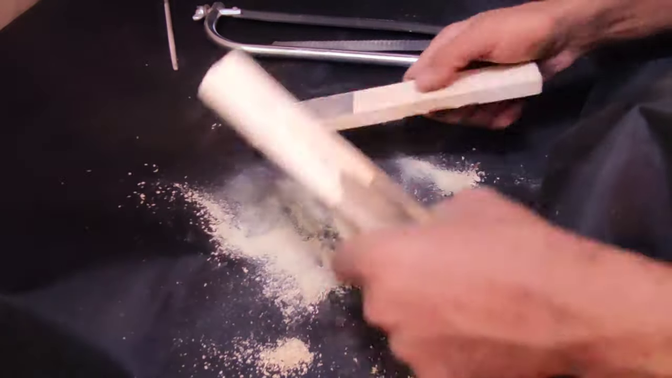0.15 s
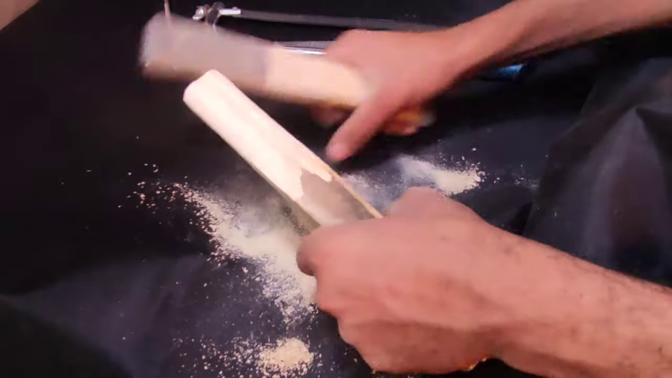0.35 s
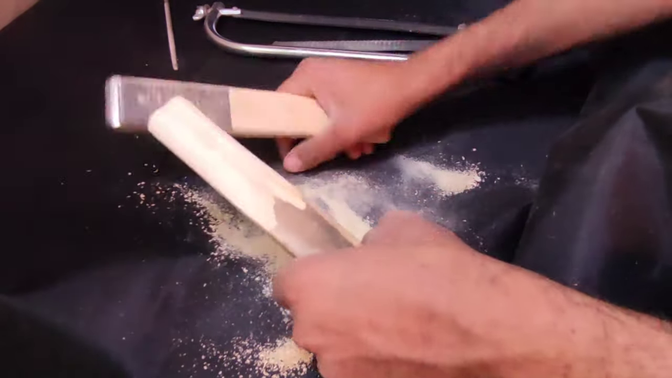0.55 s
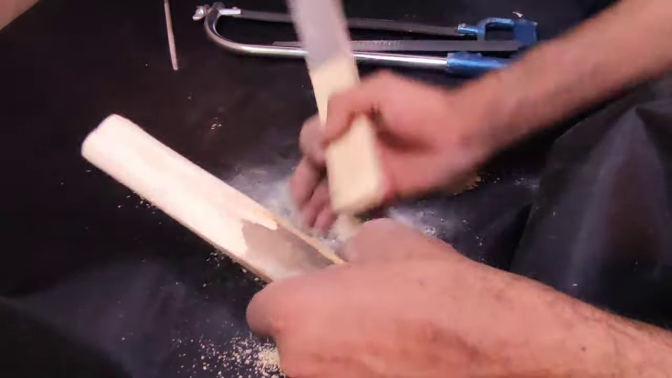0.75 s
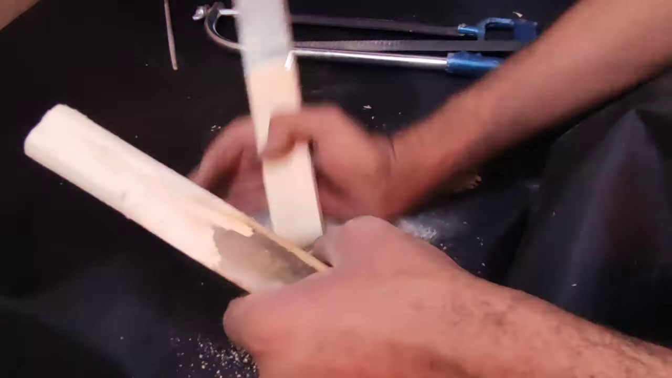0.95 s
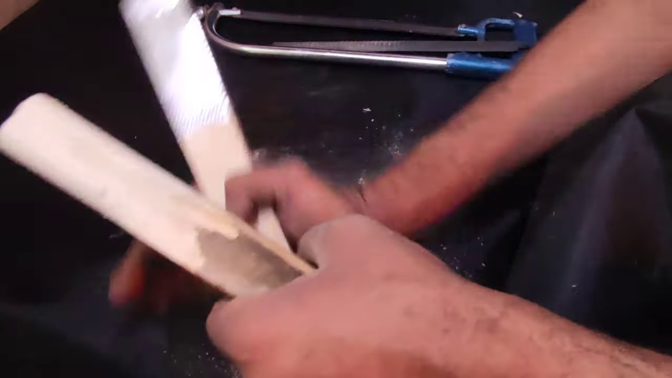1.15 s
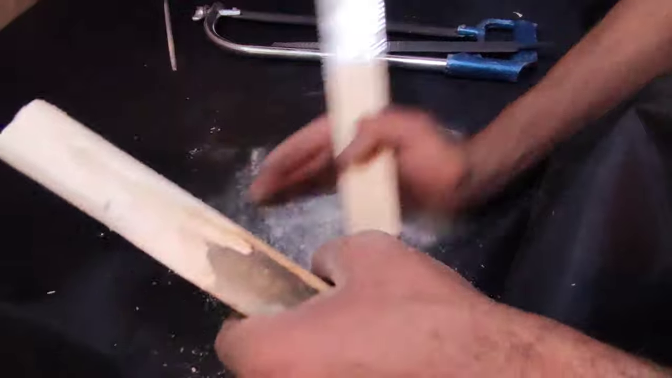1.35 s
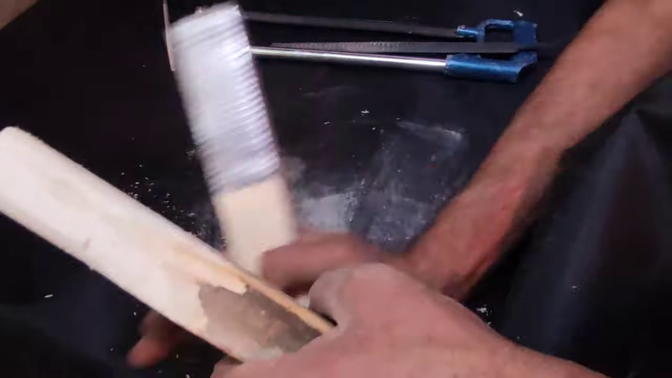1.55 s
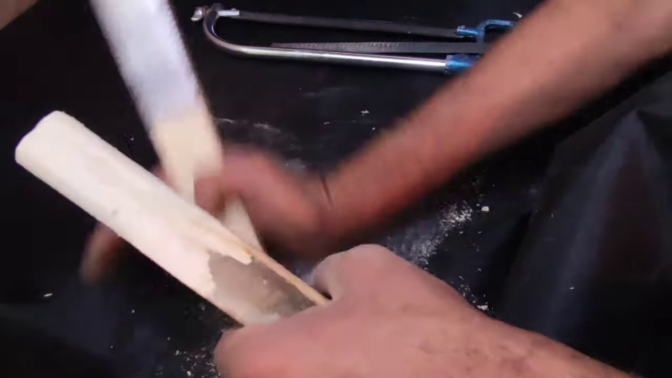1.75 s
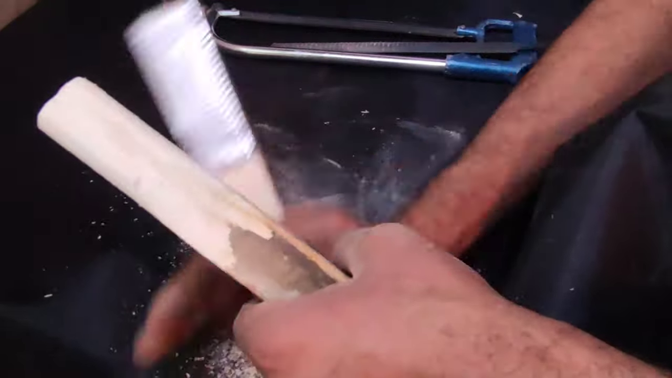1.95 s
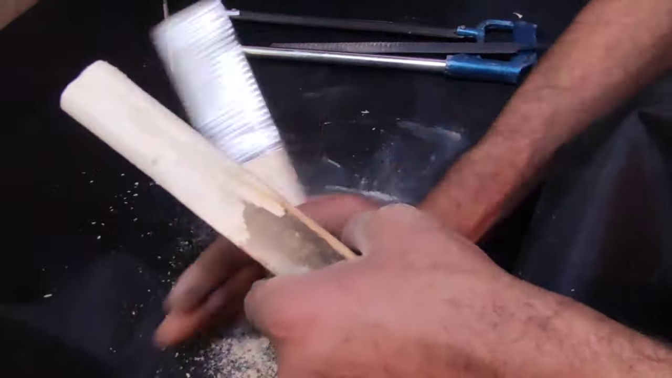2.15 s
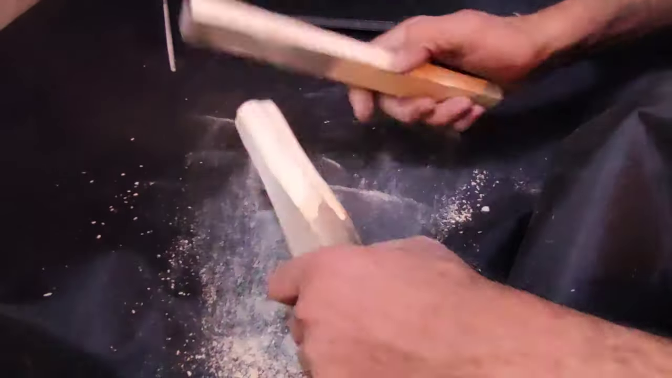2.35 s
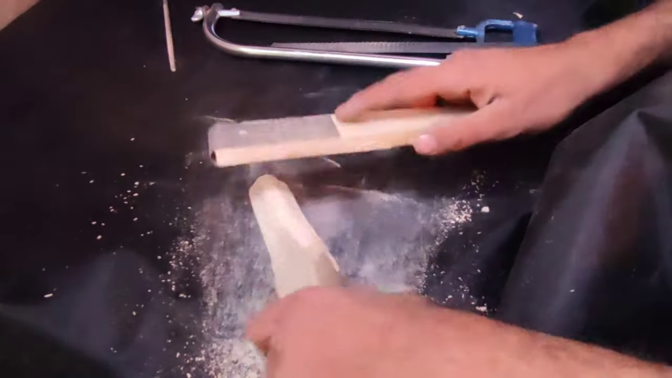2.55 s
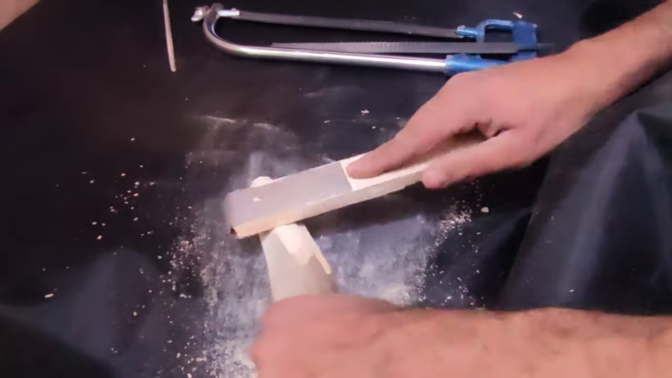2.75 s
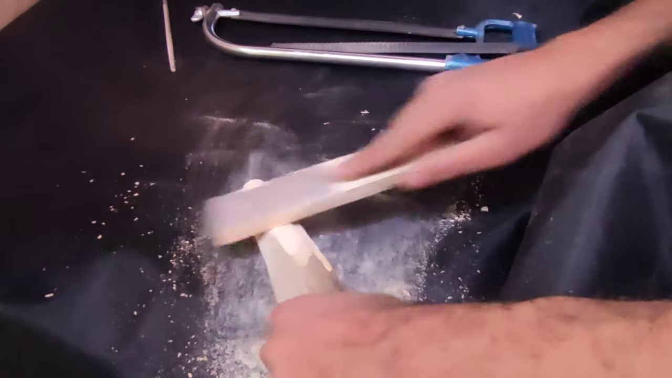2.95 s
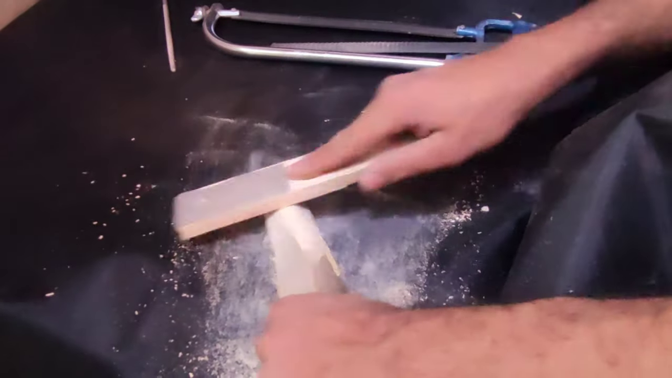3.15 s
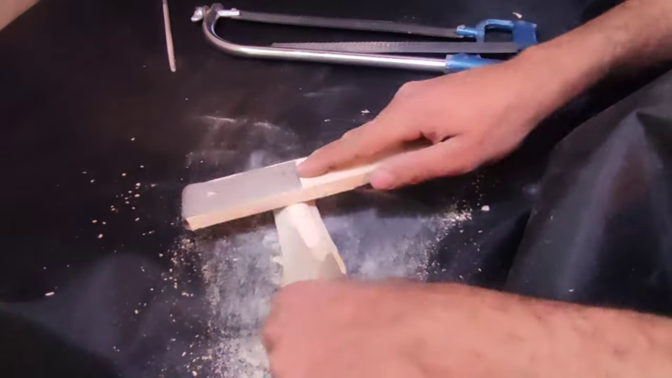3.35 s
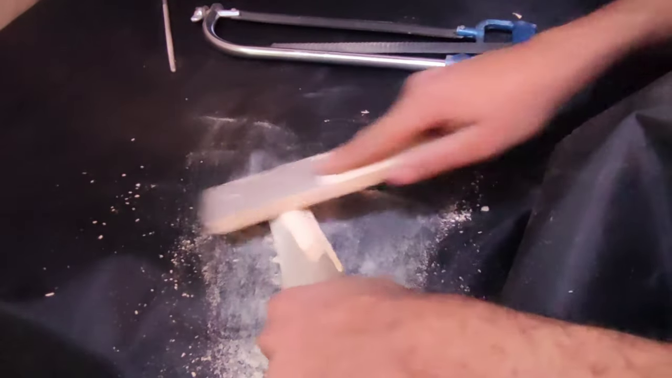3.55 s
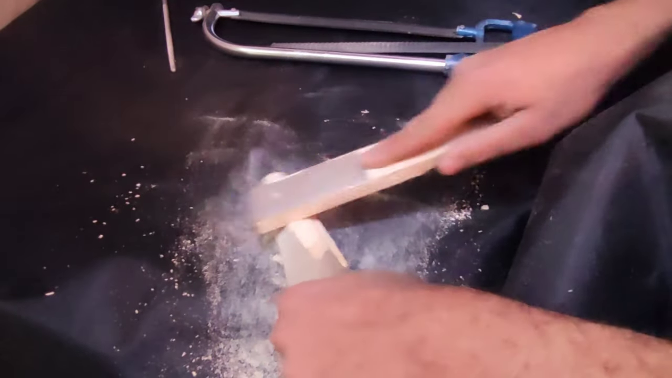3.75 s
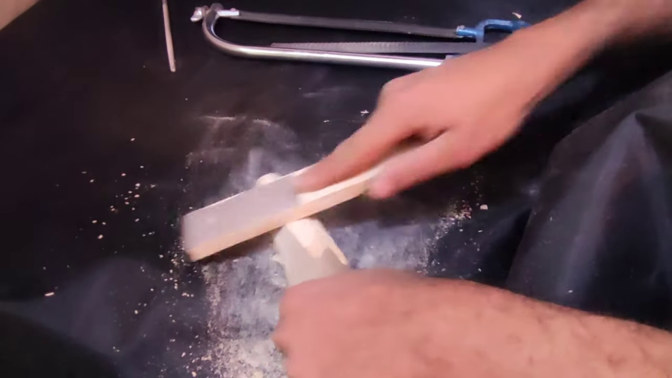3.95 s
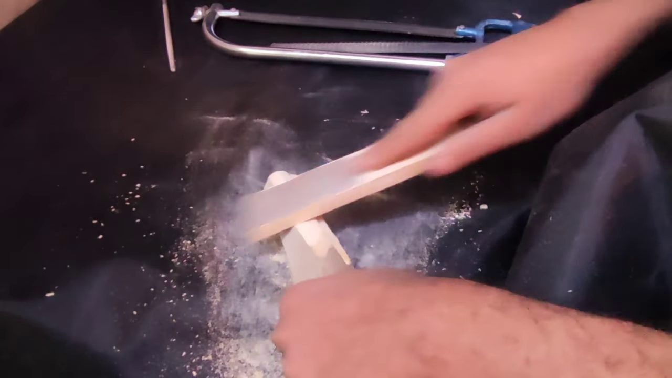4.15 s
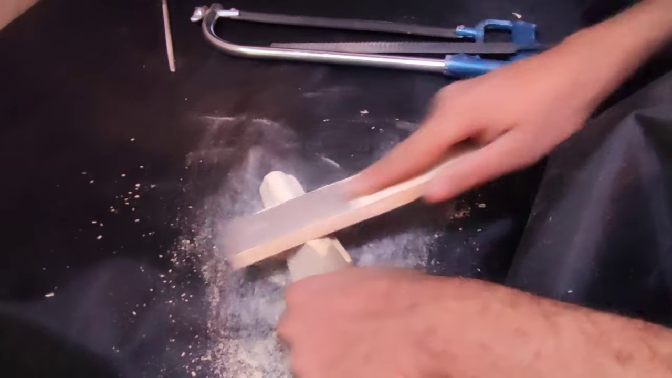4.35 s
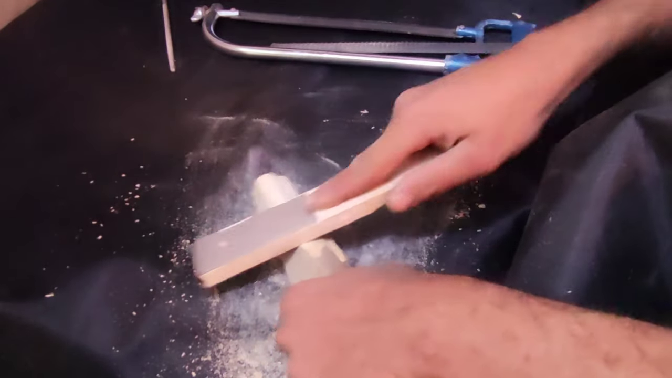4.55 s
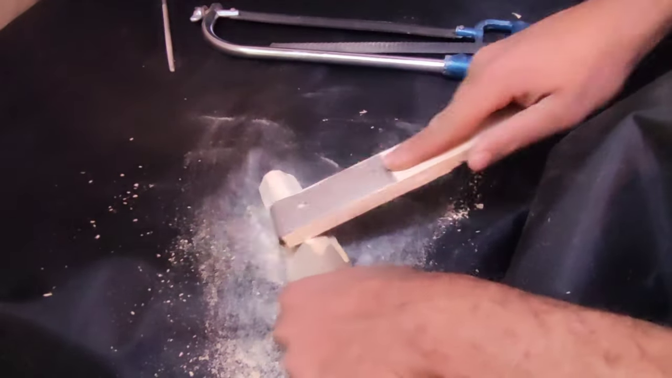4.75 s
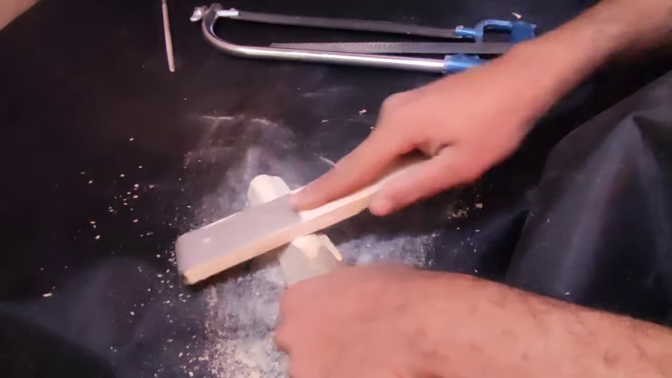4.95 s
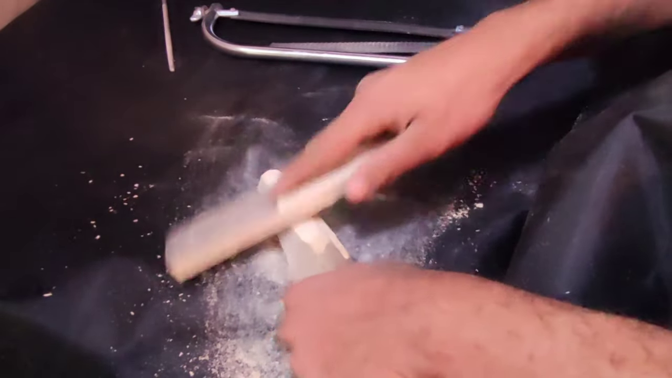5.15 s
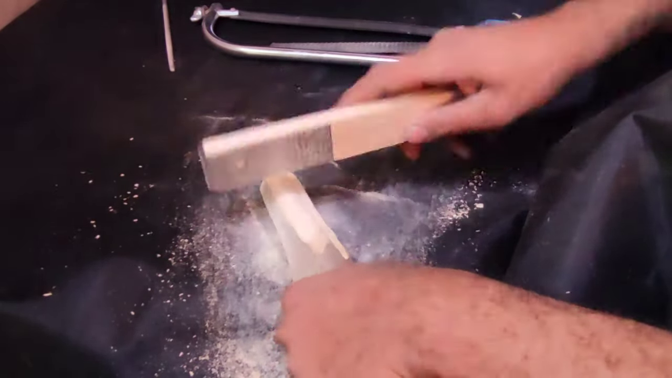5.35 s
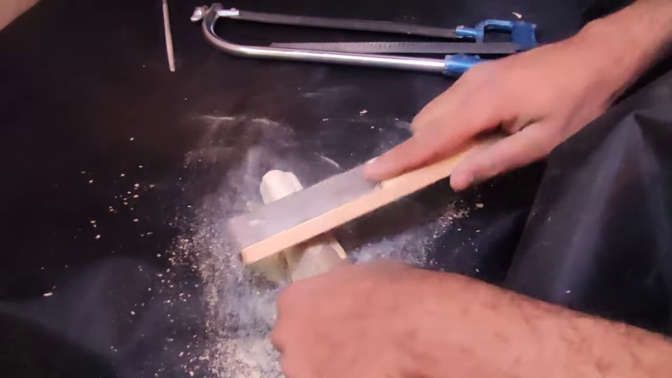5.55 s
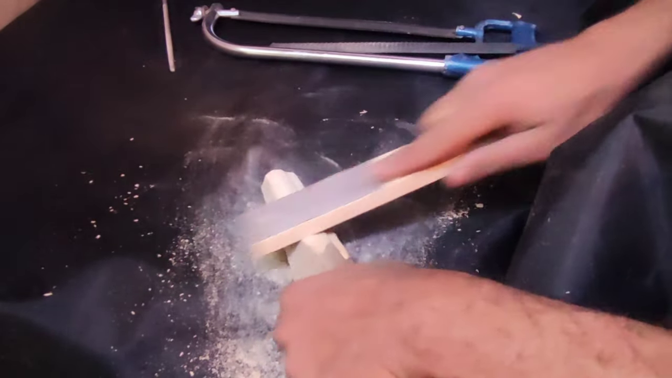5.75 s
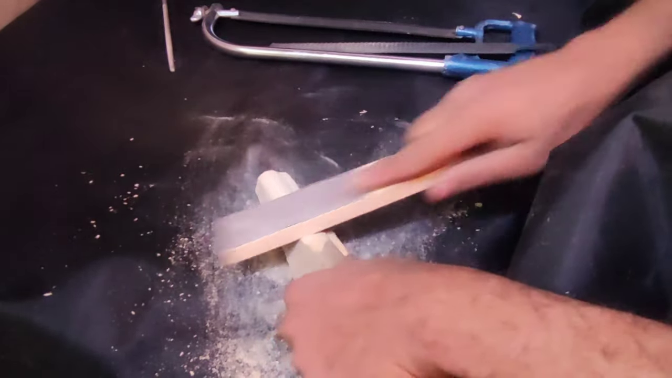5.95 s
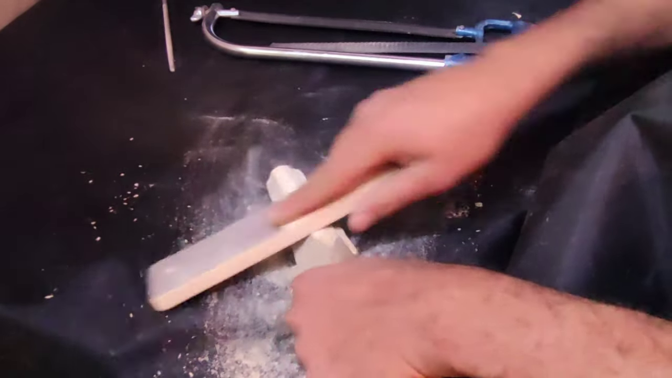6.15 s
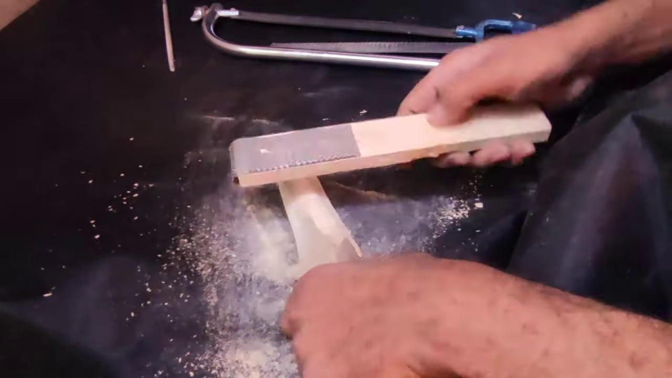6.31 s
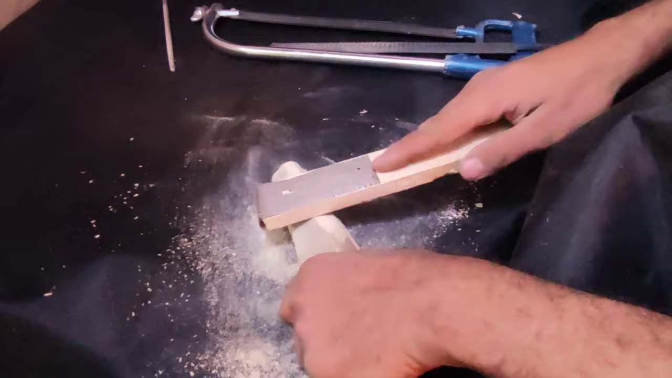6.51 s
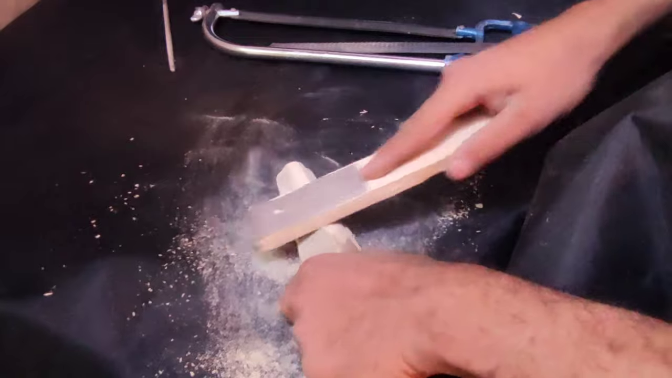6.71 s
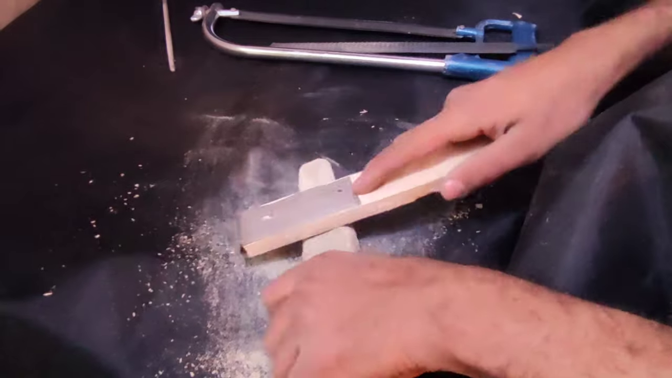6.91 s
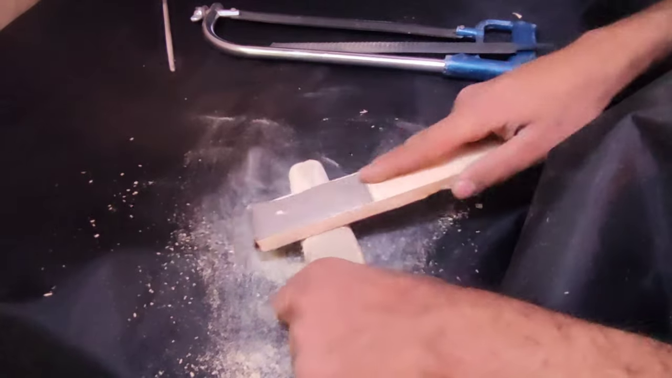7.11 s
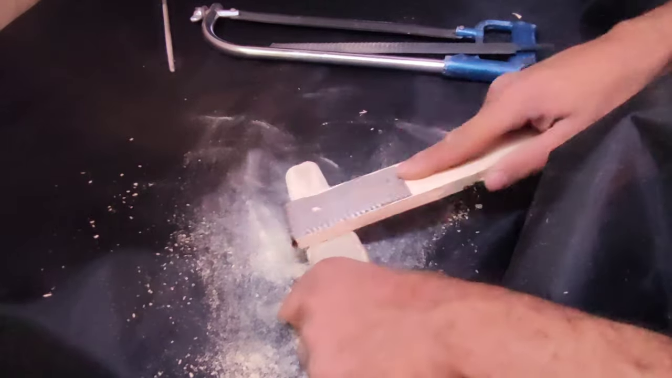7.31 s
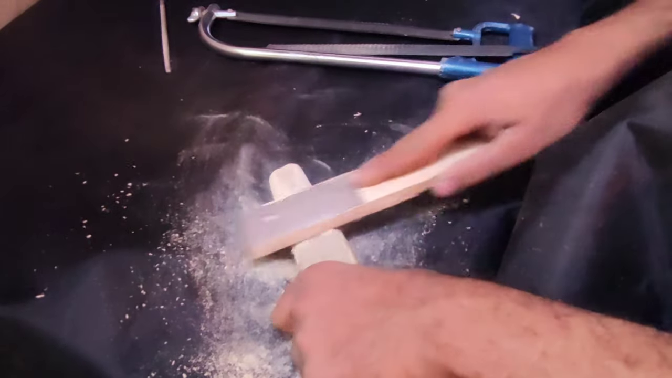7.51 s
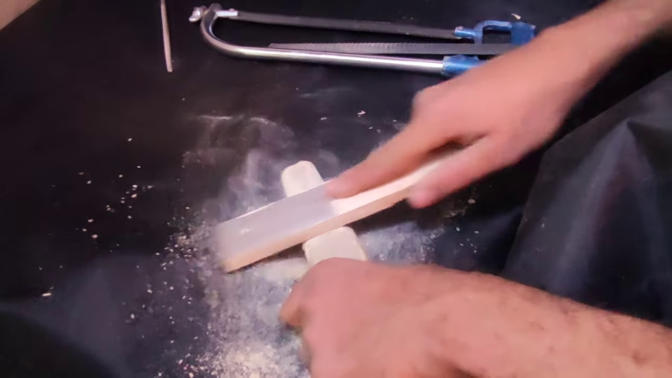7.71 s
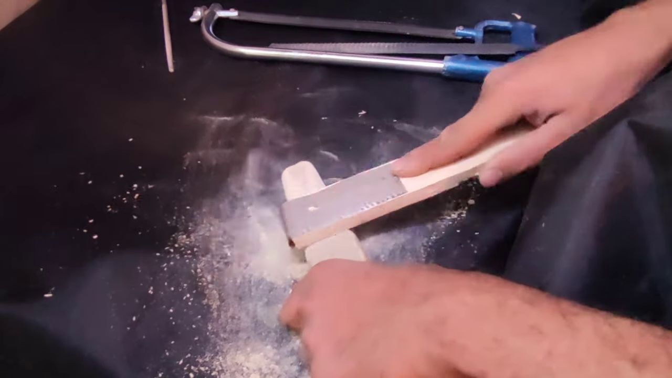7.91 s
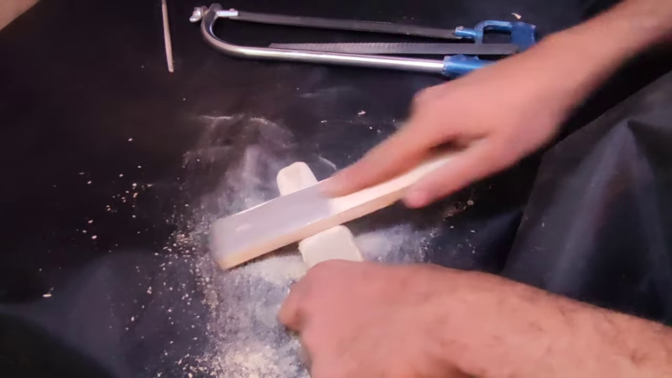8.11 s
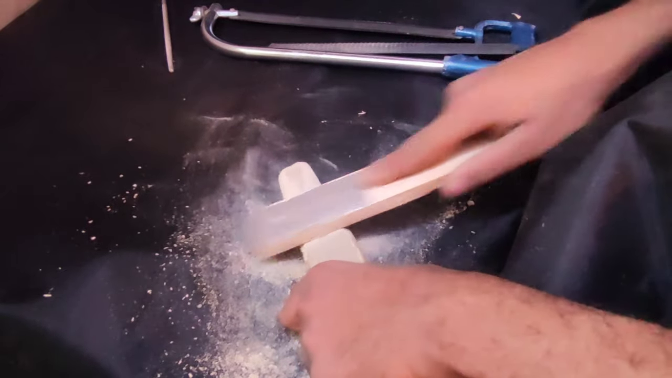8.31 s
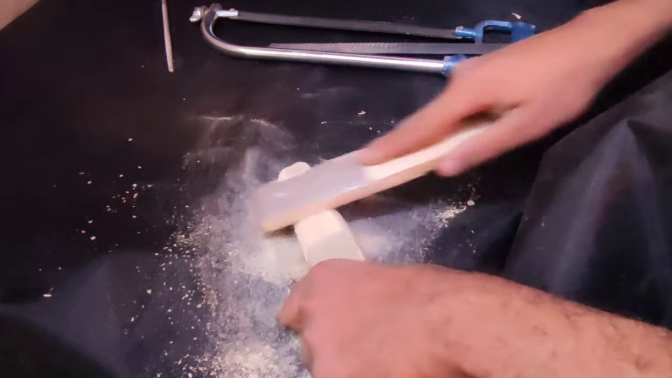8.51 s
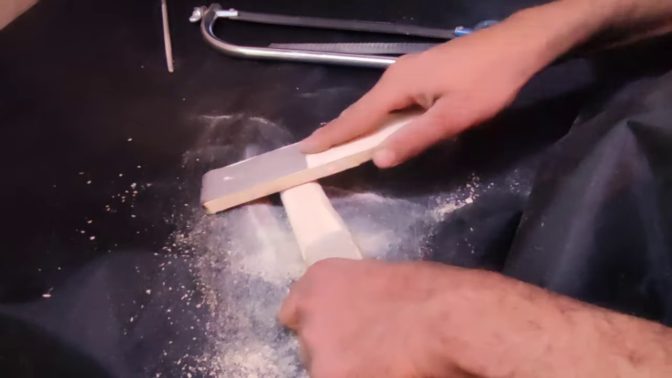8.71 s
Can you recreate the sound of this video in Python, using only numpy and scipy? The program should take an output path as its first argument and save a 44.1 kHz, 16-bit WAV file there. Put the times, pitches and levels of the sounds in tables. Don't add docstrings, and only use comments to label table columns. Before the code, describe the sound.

Brisk palm sweeps of sawdust, a few knocks, then fast gritty to-and-fro filing on wood over a hollow bench, with short pauses.

```python
import sys
import numpy as np
from scipy import signal
from scipy.fft import rfft, irfft, next_fast_len
from scipy.io import wavfile
from scipy.ndimage import uniform_filter1d

SR = 44100
rng = np.random.default_rng(int(sys.argv[2]) if len(sys.argv) > 2 else 0)


def to_wav(sig):
    pcm = np.clip(np.atleast_2d(sig), -1, 1) * 32767
    pcm = np.round(pcm).astype(np.int16)
    wavfile.write(sys.argv[1], SR, pcm.T)


def convert_level_to_amplitude(level_db):
    exponent = np.asarray(level_db, float) / 20
    return 10 ** exponent


N = 386757

# (frequency [Hz], width [Hz], level [dB])
FILE_MODES = [(4520, 355, 2.5), (4700, 1400, -2), (7050, 960, -0.5), (9240, 4100, -15), (16100, 5700, -23),
              (3100, 1070, -8.5)]
# (frequency [Hz], width [Hz], level [dB])
STICK_MODES = [(708, 66, 13.5), (1149, 132, -1.5), (1007, 590, -3), (1405, 480, 4), (612, 72, 5.5)]
# (frequency [Hz], width [Hz], level [dB])
BENCH_MODES = [(155, 13, -21), (215.3, 40.7, -0.9), (291.4, 14.8, 1.5), (334.5, 25, -2.4), (403, 26, 3.5),
               (471, 32.5, -2)]
# (frequency [Hz], width [Hz], level [dB])
DUST_MODES = [(4760, 2560, -4), (6880, 1300, 1.5), (10000, 6200, -14), (15800, 1300, -16), (3130, 930, -12)]
# (frequency [Hz], width [Hz], level [dB])
PALM_MODES = [(712, 71, 4.5), (1003, 386, -0.5), (1680, 410, -2), (2260, 670, -4.5)]
# (frequency [Hz], width [Hz], level [dB])
MAT_MODES = [(203, 133, 0), (300, 215, 1), (557, 140, -2)]


def rms_one(x):
    return x / np.sqrt(np.mean(x ** 2) + 1e-20)


def evened(x, window_s):
    power = uniform_filter1d(np.mean(x ** 2, axis=0), int(window_s * SR))
    return x / np.sqrt(power + 1e-20)


def in_time(rows):
    s, *columns = np.transpose(rows)
    t = np.arange(N) / SR
    return [np.interp(t, s, column) for column in columns]


def at_hz(points, hz):
    point_hz, value = np.transpose(points)
    return np.interp(np.log(hz), np.log(point_hz), value)


def drift(rate_hz):
    r = np.exp(-2 * np.pi * rate_hz / SR)
    noise = rng.standard_normal(N + 9000)
    return rms_one(signal.lfilter([1], [1, -2 * r, r * r], noise)[9000:])


def resonate(x, hz, width_hz):
    r = np.exp(-np.pi * width_hz / SR)
    feed = np.array([1, 0, -1]) * (1 - r * r) / 2
    return signal.lfilter(feed, [1, -2 * r * np.cos(2 * np.pi * hz / SR), r * r], x + 1e-18)


def to_ports(pair, hz):
    # (frequency [Hz], likeness [0-1])
    port_likeness = [(60, 0.98), (130, 1), (290, 0.92), (640, 0.59), (1410, 0.16), (3100, 0.12),
                     (6820, 0.057), (15000, 1)]
    lean_db = -0.66
    phased = 0.043
    alike = np.clip(at_hz(port_likeness, hz), 0, 1)
    lean = convert_level_to_amplitude(lean_db / 2 * np.array([[1], [-1]]))
    quarter_turn = np.gradient(pair[0]) / np.sin(2 * np.pi * hz / SR)
    side = np.sqrt(phased) * quarter_turn + np.sqrt(1 - phased) * pair[1]
    return lean * (np.sqrt(1 + alike) * pair[0] + np.sqrt(1 - alike) * side * [[1], [-1]])


def grit(per_s, spread_db, lumps_db, lumps_hz):
    size_db = spread_db * np.minimum(rng.exponential(1, N), 5) + lumps_db * drift(lumps_hz)
    clicks = rng.random(N) < per_s / SR
    return rms_one(convert_level_to_amplitude(size_db) * clicks * rng.standard_normal((2, N)))


def strokes(rows, rise, fall):
    power, progress = np.zeros((len(rows[0]) - 3, N)), np.zeros(N)
    for start, length, place, *level_db in rows:
        place = np.clip(place, .05, .95)
        first = max(int((start - .06) * SR), 0)
        i = np.arange(first, min(int((start + length + 0.11) * SR), N))
        from_peak = np.abs(i / SR - start - length * place)
        before = i / SR < start + length * place
        swell = (from_peak / (length * place)) ** rise
        release = (from_peak / (length * (1 - place))) ** fall
        drop_db = 7.8 * np.minimum(np.where(before, swell, release), 12)
        power[:, i] += convert_level_to_amplitude(np.array(level_db)[:, None] - drop_db) ** 2
        progress[i] = np.clip((i / SR - start) / length, 0, 1)
    return *np.sqrt(power), progress


def body(clicks, pressure, modes, shift_db={}):
    scale = np.sqrt(sum(convert_level_to_amplitude(2 * db) * np.pi * width / SR for hz, width, db in modes))
    total = 0
    for k, (hz, width, db) in enumerate(modes):
        push = clicks * pressure * convert_level_to_amplitude(shift_db.get(k, 0))
        total = total + (-1) ** k * convert_level_to_amplitude(db) * to_ports(resonate(push, hz, width), hz)
    return total / scale


def room_tone():
    # (frequency [Hz], density [dB per Hz])
    hiss_colour = [(15, -44), (25, 7.0), (213, -22), (257, -15), (879, -30.0), (1060, -27.5), (8100, -30.5),
                   (11200, -37.5), (15000, -29.0), (16000, -35)]
    hz = np.maximum(np.fft.rfftfreq(N, 1 / SR), 1)
    hiss = irfft(rfft(rng.standard_normal((2, N))) * convert_level_to_amplitude(at_hz(hiss_colour, hz)), N)
    return convert_level_to_amplitude(-59.5) * rms_one(hiss)


def workshop(x):
    t60_s, wall_cut_hz = 0.092, 4700
    size = next_fast_len(N + SR)
    w = 2 * np.pi * np.fft.rfftfreq(size)
    dull = 1 / (1 + 1j * w * SR / (2 * np.pi * wall_cut_hz))
    echoes = 0
    for k, lag in enumerate(rng.uniform(0.0067, 0.023, (6, 2, 1)) * SR):
        loop = convert_level_to_amplitude(-60 * lag / SR / t60_s) * dull * np.exp(-1j * w * lag)
        echoes = echoes + (-1) ** k * loop / (1 - loop)
    return irfft(rfft(x, size) * echoes, size)[:, :N]


def rustle():
    # (time [s], level [dB])
    fidget_curve = [(0, -64), (.28, -78), (.5, -59), (.6, -74), (.7, -105), (.86, -65), (.97, -62),
                    (1.1, -61), (1.65, -75), (2.53, -75), (2.6, -65.5), (2.7, -76), (3.2, -56.5),
                    (3.37, -68), (5.2, -62.5), (5.44, -69.5), (6.4, -68), (6.85, -62.5)]
    bright_db, = in_time(fidget_curve)
    rub = grit(7000, spread_db=1.5, lumps_db=7.0, lumps_hz=23.1)
    low = body(rub, convert_level_to_amplitude(bright_db + 1.5), PALM_MODES + MAT_MODES)
    return low + body(rub, convert_level_to_amplitude(bright_db), DUST_MODES)


def shake(on_stick):
    # (time [s], level [dB])
    arm_load = [(0.0, -64), (0.66, -69.5), (1.39, -53.5), (2.1, -61), (2.15, -53), (2.34, -71),
                (3.17, -47.5), (3.42, -59), (3.56, -48.5), (5.06, -43), (5.3, -63.5), (5.94, -49),
                (5.98, -44), (6.42, -72), (6.72, -45), (6.94, -55.5), (8.67, -57), (8.77, -37)]
    # (time [s], level [dB])
    panel_blows = [(0.44, -54.5), (0.96, -57), (1.33, -57), (1.99, -55.5), (2.13, -63), (2.579, -48.5),
                   (2.756, -42), (2.98, -40), (4.24, -41), (4.68, -31.5), (4.85, -40), (5.469, -43.5),
                   (5.602, -35), (6.479, -47), (7.989, -37), (8.44, -33.5)]
    idle_db, filed_db, follows_load = -12.5, -4, 0.54
    lag_s, thump_t60_s, thump_sway_db = 0.027, 0.42, -9.5
    load_db, = in_time(arm_load)
    push = rng.standard_normal((2, 2, N))
    sway = resonate(resonate(push[0], 25.0, 44), 28, 83)
    panel = resonate(resonate(push[1], 103, 9.1), 143, 112)

    lag = np.exp(-1 / (lag_s * SR))
    filed = signal.lfilter([1 - lag], [1, -lag], on_stick ** 2)
    filed = filed * convert_level_to_amplitude(filed_db + follows_load * (load_db + 49.5)) ** 2
    s, db = np.transpose(panel_blows)
    thumps = np.zeros(N)
    thumps[(s * SR).astype(int)] = convert_level_to_amplitude(db)
    thumps = signal.lfilter([1], [1, -convert_level_to_amplitude(-60 / (thump_t60_s * SR))], thumps + 1e-18)

    sway_level = np.hypot(convert_level_to_amplitude(load_db), convert_level_to_amplitude(thump_sway_db) * thumps)
    hum_level = np.sqrt(convert_level_to_amplitude(load_db + idle_db) ** 2 + filed + thumps ** 2)
    return sway_level * evened(to_ports(sway, 49), 0.066) + hum_level * evened(to_ports(panel, 69), 0.14)


def crack(s, level_db, t60_s, modes):
    hits = np.zeros(N)
    hits[np.round(s * SR).astype(int)] = convert_level_to_amplitude(level_db)
    fade = signal.lfilter([1], [1, -convert_level_to_amplitude(-60 / (t60_s * SR))], hits + 1e-18)
    return body(rng.standard_normal((2, N)), fade, modes)


def knocks():
    # (time [s], peak [dB], tick [dB], own ring [Hz],
    # rattle [s])
    set_downs = [(0.004, -44.5, -62, 580, 0.5), (0.132, -43.5, -65, 655, 0.02),
                 (0.412, -47, -62, 1030, 0.08), (1.309, -37.5, -35, 1810, 0.06),
                 (2.083, -48, -41, 224, 0.11), (2.576, -38, -63, 214, 0.14), (2.754, -29, -48, 320, 0.1),
                 (5.466, -22, -45, 337, 0.053), (5.597, -21, -43.5, 223, 0.11),
                 (6.164, -21, -44, 242, 0.042), (6.644, -26, -41, 218, 0.74),
                 (7.042, -42.5, -64, 1260, 0.17)]
    # (time [s], peak [dB])
    grit_ticks = [(0.877, -36), (1.241, -32), (2.3241, -21), (2.723, -34.5), (4.255, -19), (6.1624, -29),
                  (6.1705, -10), (6.576, -34), (7.1344, -13), (7.9964, -13), (8.4617, -25), (8.5717, -15)]
    longest_rattle_s = 0.036
    s, peak_db, tick_db, own_hz, rattle_s = np.transpose(set_downs)
    t = np.arange(SR // 5) / SR
    onset = 1 - np.exp(-t / 0.00051)
    shove = 1.1 * np.exp(-t / .0009)
    settle = np.clip((longest_rattle_s - t) / .01, 0, 1)
    out = np.zeros(N + len(t))
    for k in range(len(s)):
        bounces = signal.lfilter([.07], [1, -.955], rng.standard_normal(len(t)))
        decay = convert_level_to_amplitude(-60 * t / max(rattle_s[k], .004))
        push = (shove + bounces) * onset * decay * settle
        rings = 3.5 * resonate(push, own_hz[k], 59)
        for hz, width, _ in BENCH_MODES + STICK_MODES:
            answer_db = -5.5 * np.log2(hz / own_hz[k]) ** 2 + rng.standard_normal()
            rings += convert_level_to_amplitude(answer_db) * resonate(push, hz, min(width, 90))
        at = round(s[k] * SR)
        out[at:at + len(t)] += convert_level_to_amplitude(peak_db[k]) * rings / np.abs(rings).max()
    grit_s, grit_db = np.transpose(grit_ticks)
    tick = crack(s, tick_db - 8.0, 0.1, DUST_MODES)
    return out[:N] + tick + crack(grit_s, grit_db - 17.0, 0.024, FILE_MODES)


def sweeping():
    # (start [s], length [s], peak place [0-1], level [dB])
    palm_sweeps = [
        (0.77, 0.045, 0.6, -48),
        (0.946, 0.059, 0.43, -42),
        (1.136, 0.059, 1, -38),
        (1.323, 0.086, 0.6, -40),
        (1.509, 0.077, 0.36, -38),
        (1.731, 0.065, 0.57, -37),
        (1.917, 0.078, 0.84, -39),
        (2.108, 0.073, 0.6, -42.5),
    ]
    # (start [s], length [s], dust [dB], palm [dB])
    finger_rubs = [
        (0.001, 0.043, -59.5, -58),
        (0.133, 0.21, -64, -62.5),
        (0.322, 0.033, -55.5, -85),
        (0.405, 0.045, -67, -57.5),
        (0.558, 0.022, -59, -63.5),
        (0.903, 0.038, -62, -55),
        (1.253, 0.022, -63, -58),
        (2.072, 0.024, -50, -52.5),
        (2.315, 0.028, -58, -69),
    ]
    palm_db, mat_db = -2, -10.5
    rows = [(s, length, place, db, db + palm_db, db + mat_db) for s, length, place, db in palm_sweeps]
    rows += [(s, length, 0.086, db, low_db, low_db) for s, length, db, low_db in finger_rubs]
    end = int(2.5 * SR)
    bright, middle, low, progress = np.array(strokes(sorted(rows), rise=4.5, fall=3.6))[:, :end]
    clicks = grit(14000, spread_db=-3.0, lumps_db=2.0, lumps_hz=63)[:, :end]
    cupping = progress - .65
    palm = body(clicks, middle, PALM_MODES, {0: 22 * cupping, 1: 14 * cupping})
    sweep = body(clicks, bright, DUST_MODES) + palm + body(clicks, low, MAT_MODES)
    return np.pad(sweep, [(0, 0), (0, N - end)])


def file_pressure():
    # (start [s], speed [dB], weight on the wood [dB])
    bout_1 = [
        (2.806, -45.5, 8.5),
        (2.879, -41, 5),
        (2.954, -42, 8.5),
        (3.034, -42, 5),
        (3.1, -39.5, 4),
    ]
    # (start [s], speed [dB], weight on the wood [dB])
    bout_2 = [(3.396, -50.5, 1.3), (3.5, -43, 3.5), (3.564, -43.5, 5.5), (3.638, -42.5, 5.1),
              (3.711, -40.5, 3.3), (3.78, -43, 7.6), (3.849, -40.5, 1.7), (3.925, -40, 2), (3.989, -43, 2),
              (4.071, -40.5, 3.8), (4.144, -40.5, 0.033), (4.215, -42.5, 3.1), (4.295, -44, 6.7),
              (4.356, -40, 5.5), (4.433, -45, 5.2), (4.52, -41.5, 4.7), (4.591, -42, 0.23),
              (4.666, -41.5, 4.8), (4.731, -44.5, 1.7), (4.81, -40.5, 7.7), (4.875, -42, 3.8),
              (4.951, -38.5, 2.2), (5.028, -41.5, 2), (5.102, -38, 0.1)]
    # (start [s], speed [dB], weight on the wood [dB])
    bout_3 = [
        (5.665, -43, 6.5),
        (5.74, -40.5, -4.5),
        (5.809, -40, -0.5),
        (5.888, -41.5, -0.5),
        (5.964, -39, 1.2),
        (6.044, -42, -3.5),
        (6.129, -36.5, 0),
    ]
    # (start [s], speed [dB], weight on the wood [dB])
    bout_4 = [
        (6.65, -57, 16.6),
        (6.712, -49, 8.8),
        (6.791, -47, 10.6),
    ]
    # (start [s], speed [dB], weight on the wood [dB])
    bout_5 = [(7.206, -46.5, 10), (7.282, -43, -4), (7.362, -40, 6.5), (7.432, -43, -4.5),
              (7.523, -42.5, 15.5), (7.592, -44, -2), (7.661, -40, 6.5), (7.726, -42.5, -2.5),
              (7.815, -40.5, 10), (7.888, -43, -6), (7.966, -38.5, 9.5), (8.03, -43, -6),
              (8.113, -40, 11.5), (8.177, -43, -7), (8.258, -41, 10), (8.328, -42.5, -6),
              (8.399, -40.5, 10.5), (8.474, -43, -1.5), (8.542, -43.5, 9.5), (8.61, -43.5, -4.5),
              (8.687, -39.5, 10), (8.752, -46, 6)]
    bout_ends = [3.139, 5.16, 6.176, 6.84, 8.79]
    peak_places = [0.44, 0.47, 0.69, 0.69, 0.64]
    # (start [s], length [s], speed [dB], weight [dB])
    file_brushes = [
        (2.564, 0.082, -62.5, -2.5),
        (3.174, 0.03, -53.5, -7),
        (3.248, 0.057, -62.5, -3.5),
        (5.218, 0.019, -51.5, -36),
        (5.28, 0.07, -62.5, -11),
        (6.26, 0.078, -61, -30),
        (6.454, 0.065, -60.4, -5.5),
        (6.613, 0.03, -64.5, 10.5),
        (7.031, 0.022, -61.5, -3),
        (7.13, 0.019, -55, 1.5),
    ]
    turn_s = 0.027
    stick_db, stick_follows = 2, 0.6
    later_per_db = 0.014

    rows = [(*row, 0.45) for row in file_brushes]
    for bout, end, peak in zip([bout_1, bout_2, bout_3, bout_4, bout_5], bout_ends, peak_places):
        s, speed_db, weight_db = np.transpose(bout)
        stroke_ends = np.append(s[1:] - turn_s, end)
        rows += zip(s, stroke_ends - s, speed_db, weight_db, peak + 0 * s)
    s, length, speed_db, weight_db, place = np.transpose(rows)
    place = place + later_per_db * weight_db
    on_stick_db = speed_db + stick_db + stick_follows * weight_db
    table = np.transpose([s, length, place, speed_db, on_stick_db, speed_db + weight_db])
    return strokes(table, rise=3.4, fall=2.47)


def filing(on_file, on_stick, on_bench, progress):
    # (time [s], stick first mode [dB], stick second mode [dB], file low mode [dB], backing [dB])
    bite_place = [
        (2.8, -2.5, 10.5, 0, 0),
        (3.75, -0.5, 7, 1, 1.5),
        (4.4, 0.2, 1.5, 1.5, -5),
        (5.2, -3, 7, 2, -6.5),
        (5.7, -0.3, 9, 2.5, -7.5),
        (6.2, -9, 9, 1.5, -6),
        (7.3, -1, 9, 1.5, -5.5),
        (8.45, 0.5, 14.5, 2, -4),
        (8.66, 2.5, 7, 0, 2),
    ]
    # (frequency [Hz], width [Hz], level [dB])
    backing_modes = [(1890, 410, -0.5), (2346, 238, 0.3), (2570, 177, 1.6), (2840, 420, -11)]
    first_db, second_db, low_db, backing_db = in_time(bite_place)
    fine = grit(9000, spread_db=2.0, lumps_db=2.0, lumps_hz=84.0)
    coarse = grit(1500, spread_db=0.0, lumps_db=0.5, lumps_hz=64)
    grip_a, grip_b, grip_c = 3.7 * drift(9.8), 2.6 * drift(3.1), 5.3 * drift(14.2)
    dig_db = 4 * (progress - .5)
    steel = body(fine, on_file, FILE_MODES, {0: low_db})
    catches = rms_one(coarse + 0.63 * fine)
    stick = body(catches, on_stick * convert_level_to_amplitude(dig_db - 1.5), STICK_MODES, {0: first_db + grip_a, 1: second_db})
    backing = body(fine, on_file * convert_level_to_amplitude(backing_db), backing_modes, {0: grip_b, 1: grip_c, 2: -grip_c})
    bench_shift = {1: grip_b, 2: -grip_a, 3: grip_a, 4: -grip_b}
    bench = body(coarse, on_bench * convert_level_to_amplitude(dig_db), BENCH_MODES, bench_shift)
    return steel + stick + backing + bench


def scene():
    on_file, on_stick, on_bench, progress = file_pressure()
    work = rustle() + knocks() + sweeping() + filing(on_file, on_stick, on_bench, progress)
    return room_tone() + shake(on_stick) + convert_level_to_amplitude(-6.5) * workshop(work) + work


def band_limit(x):
    return signal.sosfilt(signal.butter(12, 16670, fs=SR, output="sos"), x)


def record(dry):
    mid, side = (dry[0] + dry[1]) / 2, (dry[0] - dry[1]) / 2
    side = side - 0.58 * resonate(side, 300, 220)
    side = signal.sosfilt(signal.butter(2, 8500., fs=SR, output="sos"), side)
    lean_left = 0.52 * resonate(resonate(mid, 7900, 3000), 7900, 3000)
    lean_right = 0.54 * resonate(mid, 16300, 2500)
    side = side + lean_left - lean_right
    top_cut = signal.cheby2(12, 60, 15900 * 1.04, fs=SR, output="sos")
    return band_limit(signal.sosfilt(top_cut, [mid + side, mid - side]))


dry = scene()
out = record(dry)
to_wav(out)
```